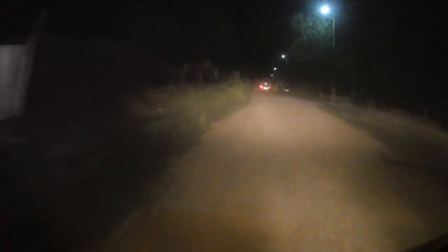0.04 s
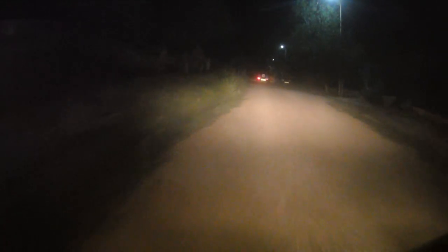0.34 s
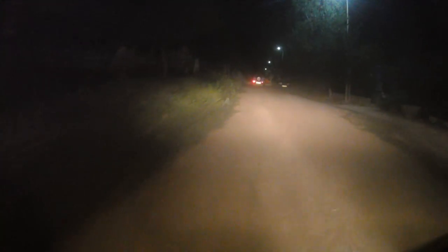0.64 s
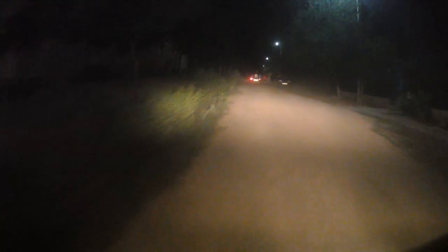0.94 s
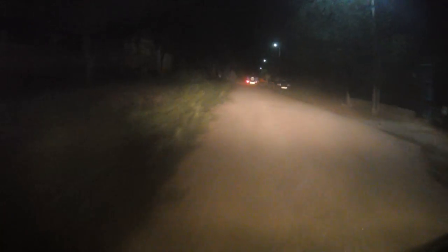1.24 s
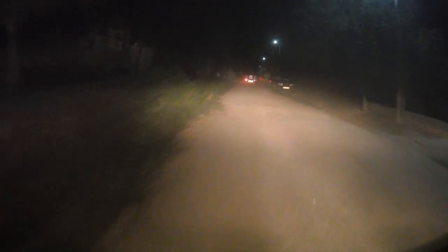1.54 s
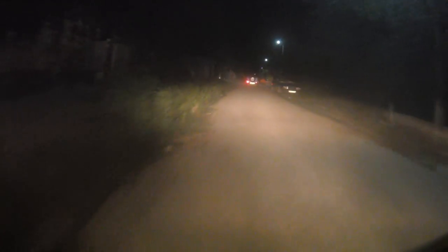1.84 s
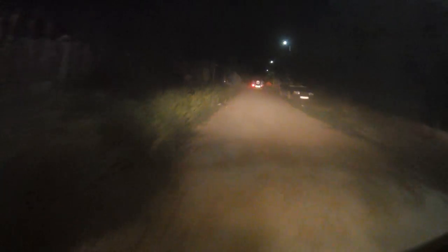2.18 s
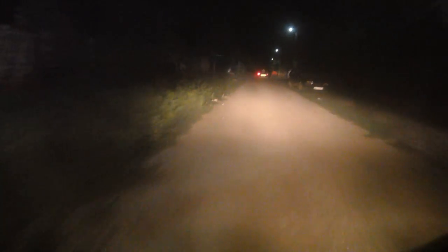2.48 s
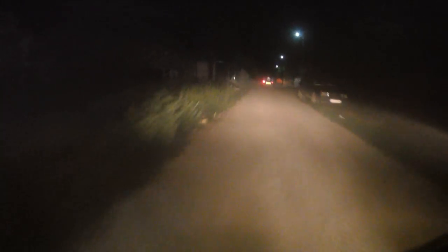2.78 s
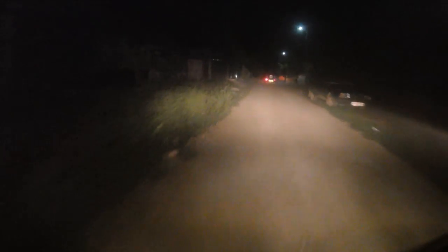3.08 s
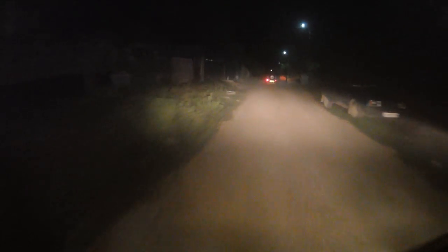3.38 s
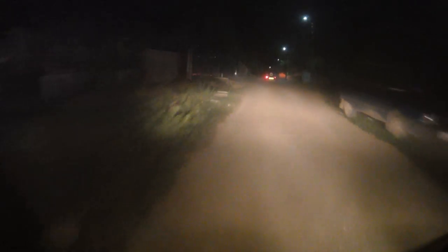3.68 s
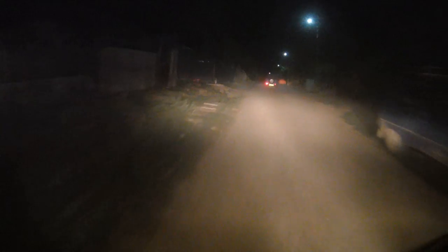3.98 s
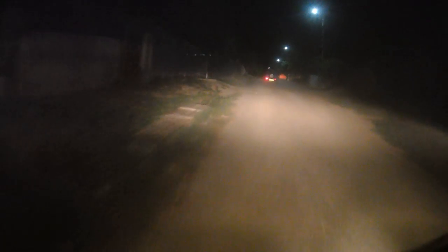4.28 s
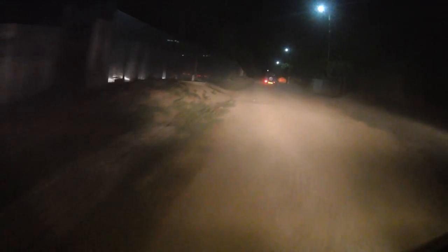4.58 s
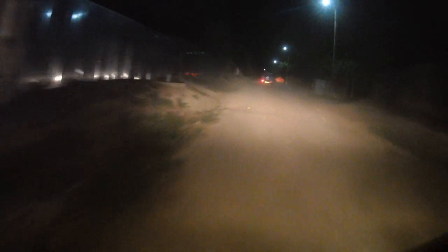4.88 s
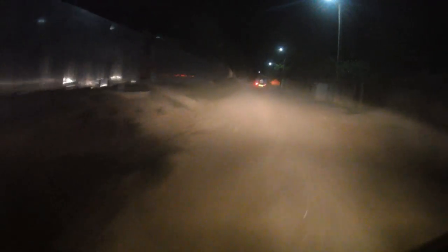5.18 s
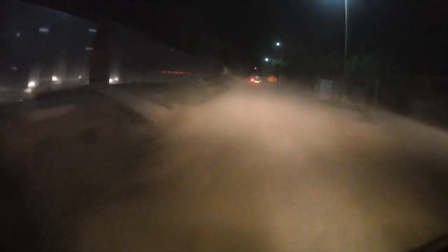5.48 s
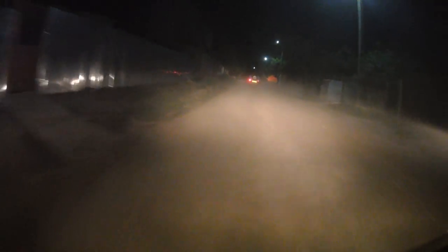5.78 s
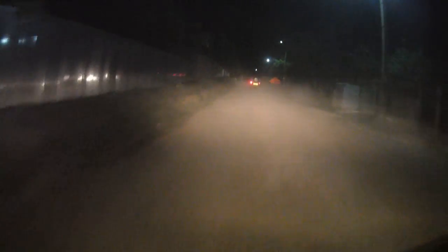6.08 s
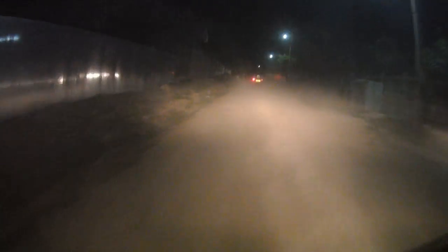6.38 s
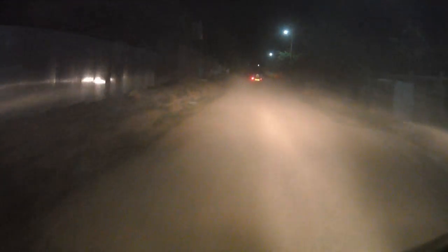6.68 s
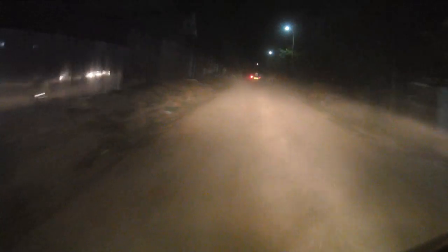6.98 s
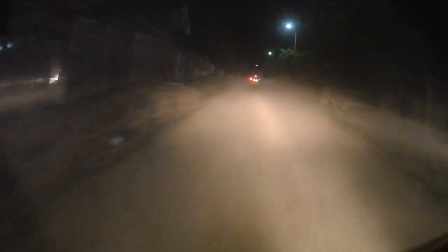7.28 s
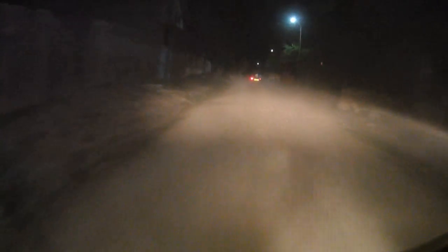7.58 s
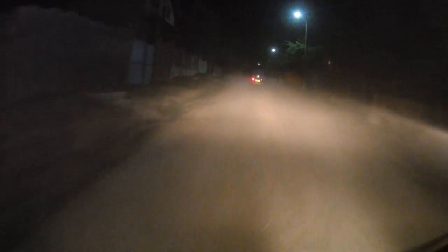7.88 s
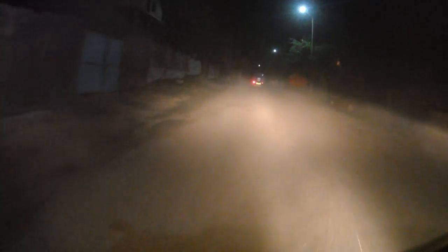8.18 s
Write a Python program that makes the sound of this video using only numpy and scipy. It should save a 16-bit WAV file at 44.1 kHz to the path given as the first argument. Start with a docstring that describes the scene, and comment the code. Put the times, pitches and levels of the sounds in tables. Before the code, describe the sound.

Inside a car on a bumpy dirt road, the cabin rumbles steadily while loose fittings rattle and knock sharply.

```python
"""A car drives at an even pace along a rough dirt road, heard from behind the windscreen.
Ruts force the body and cabin panels into vibration, a deep rumble, while the tyres roar and crunch
over grit. The shaking drives loose fittings into impacts: they rattle, buzz and knock, and trim rings.
The shaken microphone responds asymmetrically and saturates on the hardest knocks."""
import sys
import numpy as np
from scipy import signal
from scipy.fft import rfft, irfft
from scipy.io import wavfile
from scipy.ndimage import uniform_filter1d

SR = 44100
rng = np.random.default_rng(int(sys.argv[2]) if len(sys.argv) > 2 else 0)


def wrap_up_sound(samples):
    """Save the sound to the file named by the first command line argument, as 16-bit audio."""
    columns = np.atleast_2d(samples).T
    # keep every value between -1 and 1, then stretch to whole-number steps
    tamed = np.clip(columns, -1, 1)
    steps = np.round(tamed * 32767).astype(np.int16)
    wavfile.write(sys.argv[1], SR, steps)


N = 367794
TIME = np.arange(N) / SR

# Hard impacts of a loose fitting: t/s, relative peak level/dB, contact time/ms
IMPACTS = [(.120,2,0.13), (.147,-1,.18), (.23,4.5,.22), (.367,3,.22), (0.501,1.5,.3), (.566,-1.5,0.17),
           (.607,3,.28), (.834,3.5,.25), (1.025,-4,.2), (1.34,1,.16), (1.663,3.5,0.2), (1.673,4,.12),
           (1.786,3,.13), (1.822,0,.2), (1.87,3,.24), (2.057,-9,.12), (2.308,-1.5,0.22), (2.549,0,.21),
           (2.924,3,0.26), (3.049,2,.24), (3.115,-5.5,0.097), (3.378,-4.5,.1), (3.508,0,.16),
           (3.89,-1.5,0.13), (3.938,2,0.2), (3.943,5.5,.11), (4.063,-0.5,0.25), (4.119,1.5,0.11),
           (4.167,1,.17), (4.208,-4,0.13), (5.802,-4,0.18), (5.82,.5,.22), (5.961,2,.28), (6.449,2.5,.13),
           (6.481,0.5,.15), (6.534,2,0.13), (6.707,-0.5,.13), (6.957,-2,.17), (7.132,1,.12),
           (7.579,-1,0.18), (7.589,-1.5,.09), (7.614,0.5,.15), (7.701,5,.23), (7.973,-1,0.12),
           (8.008,-2.5,.09), (8.018,0.5,.08), (8.095,-1.5,.12), (8.308,-2.5,0.085)]
# Spectrum of contact noise, for grit and fittings alike: f/Hz, relative level/dB
CONTACT_SPECTRUM = [(500, -8.5), (1200, 4), (2000, 14), (3000, 3), (4500, 5), (6000, 2.1), (8000, 0)]


def undb(db):
    """Amplitude ratio of a level in decibels."""
    return 10 ** (np.asarray(db) / 20)


def unit(x):
    """Normalisation to an rms of 1."""
    return x / np.sqrt(np.mean(x ** 2))


def contour(table):
    """Linear interpolation of rows (t/s, level/dB) to one level a sample."""
    return np.interp(TIME, *np.transpose(table))


def colour(x, spectrum):
    """Spectral shaping by rows (f/Hz, level/dB), falling 12 dB an octave above the last; rms 1."""
    hz, db = np.transpose(spectrum)
    bins = np.maximum(np.fft.rfftfreq(N, 1 / SR), 1)
    gain = undb(np.interp(np.log(bins), np.log(hz), db))
    roll_off = np.minimum(hz[-1] / bins, 1) ** 2
    return unit(irfft(rfft(x) * gain * roll_off, N))


def fluctuation(rate):
    """Low-pass noise that changes about rate times a second; rms 1."""
    width = int(SR / rate)
    return unit(uniform_filter1d(uniform_filter1d(rng.standard_normal(N), width), width))


def levelled(x, window_s):
    """Division by the running rms removes the slow swells of a noise."""
    return x / np.sqrt(uniform_filter1d(x ** 2, int(window_s * SR)) + 1e-9)


def contacts(rows):
    """One-sided pulses from rows (t/s, level/dB, contact time/ms): shorter contact, wider bandwidth."""
    out = np.zeros(N)
    for t, db, ms in rows:
        near = slice(*np.searchsorted(TIME, [t - .008, t + .008]))
        offset = np.abs(TIME[near] - t) / (ms / 1000)
        out[near] -= undb(db) * (1 + offset) * np.exp(-offset)
    return out


def shaking(attack_s=.05, hold_s=.008, release_s=.042):
    """Excitation level in dB: road roughness and the jolts of ruts add incoherently, in power."""
    # Roughness of the road between ruts: t/s, level/dB
    roughness = [(0, -26.5), (.15, -24), (1.0, -17), (1.2, -19), (1.55, -16.5), (2.0, -22.5), (2.3, -16),
                 (2.7, -19), (3.4, -19.5), (3.75, -17.5), (4.4, -20.5), (4.95, -20), (5.2, -18.5),
                 (5.5, -19.5), (6.3, -17), (6.85, -19.5), (7.4, -18), (8.34, -19.5)]
    # Jolts as the wheels drop into ruts: t/s, level/dB
    ruts = [(.061, -22), (.15, -15), (.241, -15.5), (.353, -14), (.503, -16), (.558, -17), (.607, -16.5),
            (.766, -16.5), (.835, -16), (.923, -16), (.98, -17), (1.364, -15), (1.673, -13.5),
            (1.778, -11.5), (1.851, -17.5), (2.45, -16.5), (2.542, -17.5), (2.867, -18), (2.928, -15),
            (3.103, -15.5), (3.363, -14.5), (3.469, -14.5), (3.529, -13.5), (3.879, -11.5), (3.935, -13),
            (4.074, -13), (4.189, -17), (5.13, -17), (5.35, -19), (5.811, -15), (5.887, -15.5),
            (5.963, -14.5), (6.32, -17), (6.447, -12.5), (6.522, -13.5), (6.701, -14.5), (6.96, -15),
            (7.051, -14.5), (7.132, -12.5), (7.581, -12), (7.695, -16), (8.0, -10), (8.11, -13),
            (8.304, -17)]
    power = undb(contour(roughness)) ** 2
    for t, db in ruts:
        rise = np.clip(1 + (TIME - t) / attack_s, 0, 1)  # the tyre squashes
        decay = np.exp(-np.maximum(TIME - t - hold_s, 0) / release_s)  # the dampers absorb the jolt
        power += (undb(db) * rise * decay) ** 2
    return 10 * np.log10(power)


def body_boom(shake_db, gain_db=-1.5, sway_s=.08, follow=0.61):
    """Inertia: the heavy body booms at low frequencies and follows the shaking sluggishly."""
    # Spectrum of the car body: f/Hz, relative level/dB
    body_spectrum = [(8, -19), (22, -3.5), (35, -4.5), (50, 2), (75, -4), (105, -7), (170, -23.5),
                     (300, -45)]
    # Slow swell of the boom: t/s, relative level/dB
    swell = [(0, -11), (.95, -12), (1.4, -17), (1.9, -7.5), (2.5, -12), (3.0, -9), (3.5, -12.5), (4.1, -7),
             (4.45, -19), (4.95, -8), (5.4, -12.5), (5.9, -9), (6.1, -13.5), (6.35, -8.5), (6.85, -6),
             (7.2, -15.5), (7.55, -10.5), (8.34, -11.5)]
    sway_db = follow * uniform_filter1d(shake_db, int(sway_s * SR))
    boom = levelled(colour(rng.standard_normal(N), body_spectrum), window_s=.18)
    return boom * undb(contour(swell) + sway_db + gain_db)


def cabin_roar(shake_db, judder, gain_db=-0.42, judder_db=1.64):
    """Forced vibration: the tyres drum on the ruts and the cabin panels radiate a roar."""
    # Spectrum of the cabin panels: f/Hz, relative level/dB
    panel_spectrum = [(45, -17), (80, -2.5), (115, -0.05), (165, -0.5), (210, 0), (270, -4.5), (400, -10),
                      (600, -16), (900, -24.5), (1500, -33), (2400, -44), (4000, -59.5), (8000, -71.5)]
    roar = levelled(colour(rng.standard_normal(N), panel_spectrum), window_s=.045)
    return roar * undb(shake_db + gain_db + judder_db * judder)


def tyre_roar(shake_db, judder, gain_db=-25.5, follow=0.25, judder_db=2.5):
    """Amplitude modulation: rolling noise flutters with the judder and swells a little on bumps."""
    # Spectrum of the rolling tyres: f/Hz, relative level/dB
    tyre_spectrum = [(150, -7.5), (400, 2), (800, -2), (1500, -14), (2500, -25), (4000, -34.5),
                     (8000, -40.5)]
    roar = colour(rng.standard_normal(N), tyre_spectrum)
    return roar * undb(gain_db + follow * shake_db + judder_db * judder)


def grit(shake_db, judder, gain_db=-40, grain_db=4.0, judder_db=-1.0, grain_rate=340):
    """Granular noise: small stones crunch under the tyres in short, uneven bursts."""
    grains = rng.standard_normal(N) * undb(grain_db * fluctuation(grain_rate) + judder_db * judder)
    return colour(grains, CONTACT_SPECTRUM) * undb(shake_db + gain_db)


def rattle(shake_db, count=640, gain_db=3.0, scatter_db=1.5, contact_ms=0.2, contact_spread=0.17):
    """Random impacts: loose parts chatter at a rate proportional to the amplitude of the shaking."""
    quantiles = rng.random(count)
    size, softness = np.clip(rng.standard_normal((count, 2)).T, -1.5, 1.5)
    activity = np.cumsum(undb(shake_db))
    times = np.interp(quantiles, activity / activity[-1], TIME)
    # The parts have little play, so their blows stop growing on hard jolts.
    drive_db = np.minimum(np.interp(times, TIME, shake_db), -16)
    levels = drive_db + gain_db + scatter_db * size
    pulses = contacts(zip(times, levels, contact_ms * np.exp(contact_spread * softness)))
    # Light parts radiate little bass.
    return signal.sosfilt(signal.butter(1, 120, "high", fs=SR, output="sos"), pulses)


def buzz(pressure, gain_db=-57, play=0.11, growth=0.84):
    """Contact nonlinearity: a swing that takes up a fitting's play makes its faces crackle."""
    squeeze = np.clip(-pressure - play, 0, 1)
    return colour(rng.standard_normal(N) * squeeze ** growth, CONTACT_SPECTRUM) * undb(gain_db)


def resonance(x, hz, width_hz):
    """Response of a damped resonator with unit gain at its centre frequency."""
    return signal.lfilter(*signal.iirpeak(hz, hz / width_hz, fs=SR), x)


def knocks(gain_db=-4.5, swing_s=.006):
    """Impulse response: a fitting hits its stop with a dry clack and the cabin answers with a thump."""
    pulses = contacts(IMPACTS) * undb(gain_db)
    thump = resonance(pulses, hz=135, width_hz=75) * undb(3)
    clack = resonance(pulses, hz=1600, width_hz=900) * undb(-7)
    # The pressure swings gently back around each blow.
    backswing = uniform_filter1d(pulses, int(swing_s * SR))
    return pulses - backswing + thump + clack


def cracks(gain_db=-33, burst_ms=0.3, hardness_db=9):
    """Contact hardness: a knock's burst of noise gains hardness_db for each halving of contact time."""
    bursts = contacts((t, db - hardness_db * np.log2(ms / .12), burst_ms) for t, db, ms in IMPACTS)
    return colour(rng.standard_normal(N), CONTACT_SPECTRUM) * bursts * undb(gain_db)


def taps(shake_db, count=36, gain_db=7.0, scatter_db=0.5, contact_ms=0.15, contact_spread=0.12):
    """Light impacts: the fitting taps at random, at a rate proportional to the power of the shaking."""
    quantiles = rng.random(count)
    size, softness = rng.uniform(-1.1, 1, (count, 2)).T
    energy = np.cumsum(undb(shake_db) ** 2)
    times = np.interp(quantiles, energy / energy[-1], TIME)
    levels = np.interp(times, TIME, shake_db) + gain_db + scatter_db * size
    return contacts(zip(times, levels, contact_ms * np.exp(contact_spread * softness)))


def trim_rings():
    """Free vibration: a struck piece of trim rings in one exponentially damped mode."""
    # Rings of loose trim: t/s, f/Hz, peak level/dB, 60 dB decay time/s
    rings = [(.362, 760, -16, .05), (1.335, 950, -20, .06), (1.664, 720, -15, .06),
             (1.673, 1700, -18, .035), (2.797, 890, -16, .1)]
    out = np.zeros(N)
    for t, hz, db, t60 in rings:
        age = np.maximum(TIME - t, 0)
        envelope = undb(db - 60 * np.minimum(age / t60, 2))
        out += envelope * np.sin(2 * np.pi * hz * age)
    return out


def scene(bump_db=1.0, bump_rate=22, judder_rate=130):
    """Superposition of body, fittings and tyres, with small random bumps and faster wheel judder."""
    shake_db = shaking() + bump_db * fluctuation(bump_rate)
    judder = fluctuation(judder_rate)
    rumble = body_boom(shake_db) + cabin_roar(shake_db, judder)
    interior = rumble + knocks() + taps(shake_db) + rattle(shake_db)
    tyres = tyre_roar(shake_db, judder) + grit(shake_db, judder)
    return (interior + buzz(interior) + cracks() + trim_rings() + tyres)[None]


def record(dry, asymmetry=0.32, cutoff_hz=8150):
    """Asymmetric distortion: the microphone favours negative swings, saturates and cuts the treble."""
    bent = dry - asymmetry * dry * np.tanh(dry)
    saturated = np.clip(bent, -.98, .98)
    low_pass = signal.firwin(101, cutoff_hz, window=("kaiser", 7), fs=SR)
    return signal.fftconvolve(saturated, low_pass[None], mode="same")


dry = scene()
out = record(dry)
wrap_up_sound(out)
```